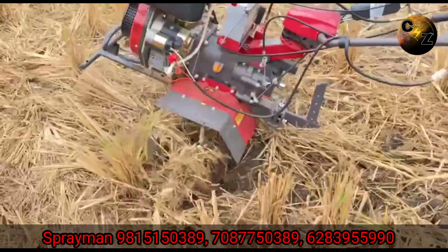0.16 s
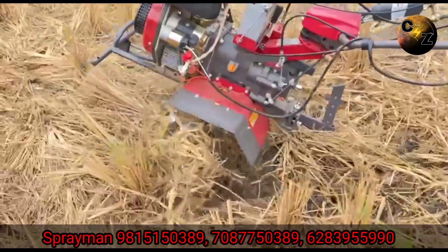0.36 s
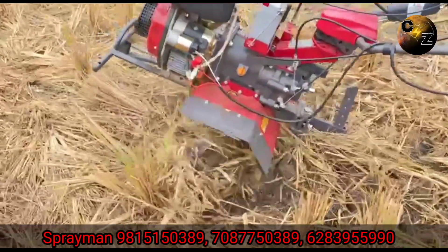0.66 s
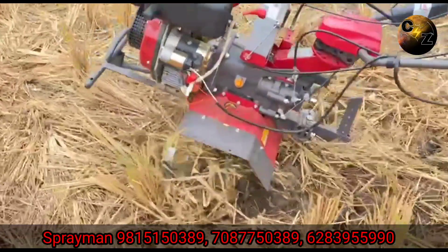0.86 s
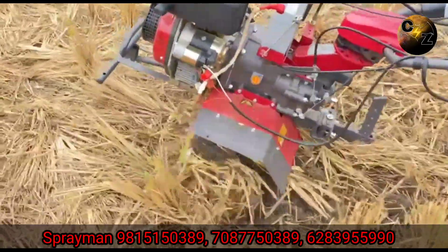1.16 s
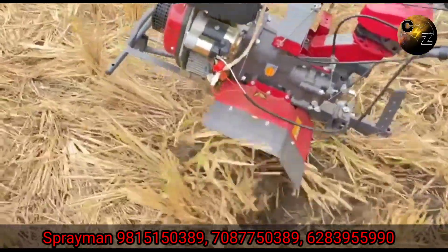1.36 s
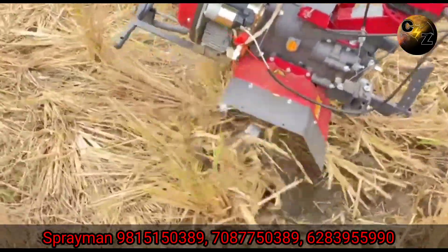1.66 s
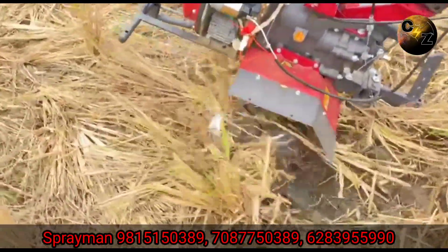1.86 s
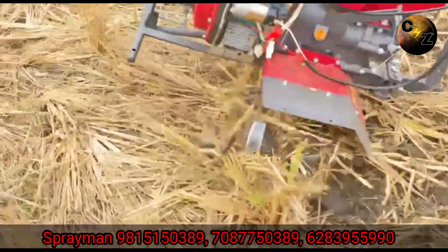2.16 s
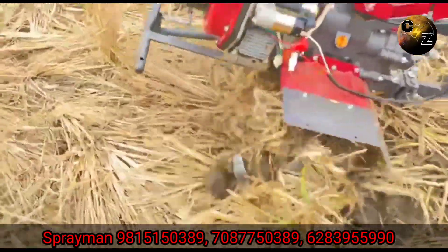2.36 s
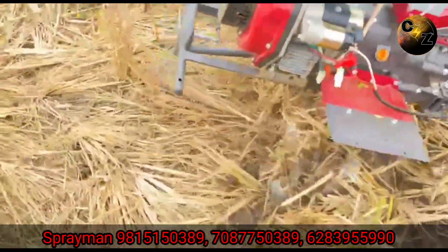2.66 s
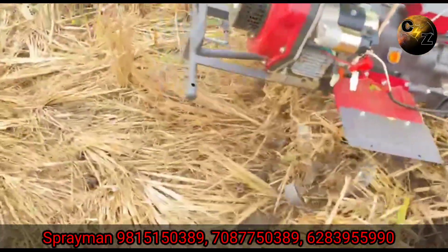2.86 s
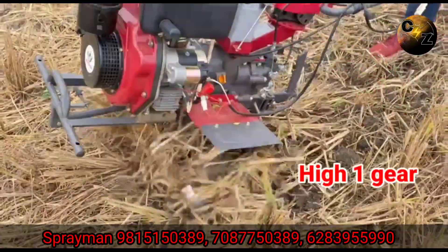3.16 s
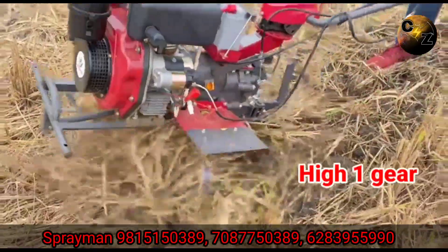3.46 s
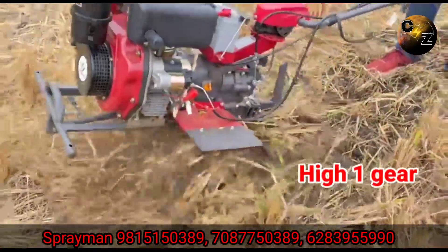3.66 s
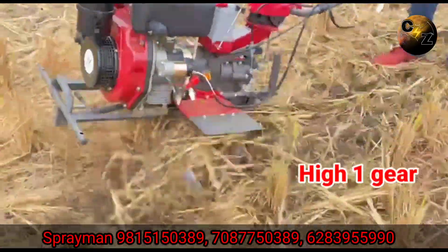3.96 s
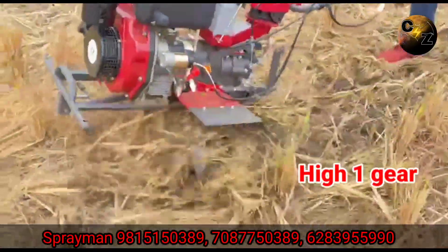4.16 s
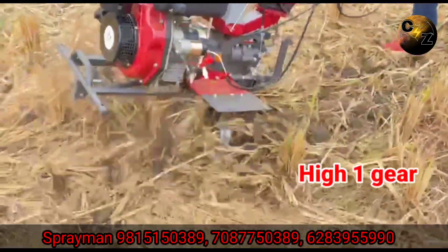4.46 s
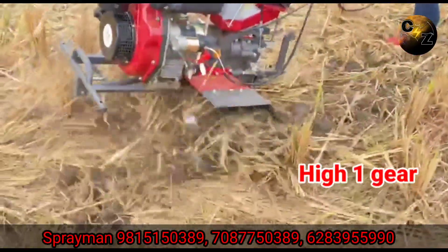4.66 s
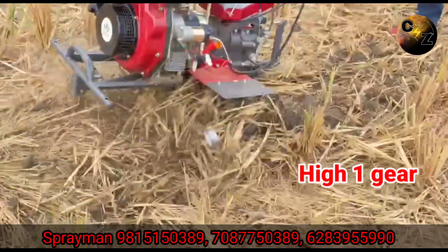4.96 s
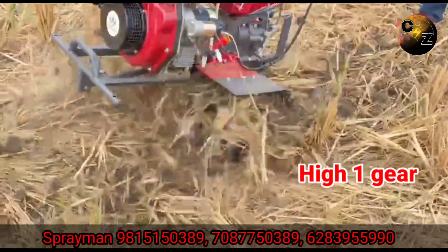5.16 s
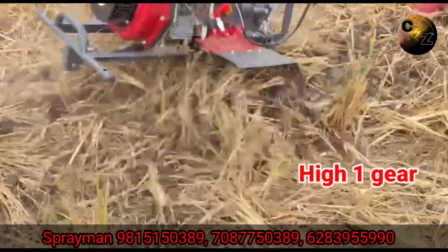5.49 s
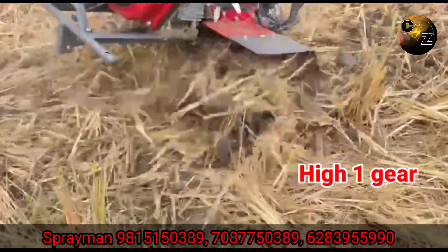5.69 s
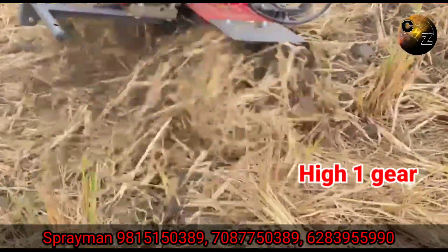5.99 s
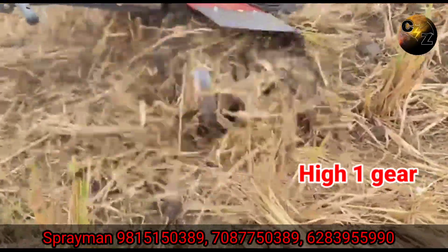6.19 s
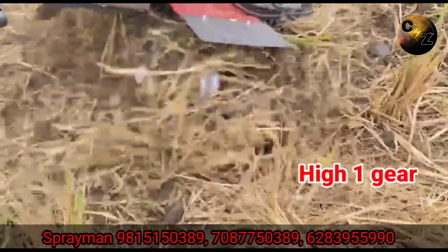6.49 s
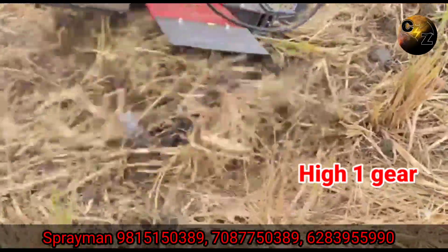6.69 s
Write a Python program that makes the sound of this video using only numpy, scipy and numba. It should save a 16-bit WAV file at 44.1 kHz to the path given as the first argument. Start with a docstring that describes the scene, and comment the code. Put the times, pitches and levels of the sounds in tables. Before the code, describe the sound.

From the start, a single-cylinder diesel tiller runs close to a stereo microphone in an open field. It has a fast, even beat of ringing metallic knocks and low exhaust thuds and pops. Engine parts and thrown straw rattle in time over a low wash of fan noise and churning soil. Over the first three seconds it grows slightly louder and shifts in tone as the machine turns, with a few harder rattles around 2.5 seconds. At about 3.3 seconds the sound quickly fades to a farther spot, where the same engine is much quieter and a touch slower. A faint gearbox whine swells gently around 4.2 seconds, most clearly at 5 seconds, and again near 5.7 seconds. The chugging and rattling continue, rising a little in level until the end, near 7 seconds.

```python
"""Diesel tiller in a stubble field

A one-cylinder four-stroke in the open, on a stereo recorder at two spots: close, then, after a short
cross-fade, farther off and much quieter. Each cycle combustion rings the block, the exhaust thuds and
pops a good half cycle later, and valve gear and thrown straw rattle in time over a wash of fan and soil.
The tone shifts as the machine turns; at the far spot a faint gearbox whine swells now and then."""
import sys
import numpy as np
from scipy import signal
from scipy.fft import rfft, irfft, next_fast_len
from scipy.io import wavfile
from scipy.ndimage import uniform_filter1d
from numba import njit

SR = 44100
rng = np.random.default_rng(int(sys.argv[2]) if len(sys.argv) > 2 else 0)


def waveform_to_disk(signal):
    """Save audio, clipped to [-1, 1], as 16-bit WAV at the path in sys.argv[1]."""
    frames = np.transpose(np.atleast_2d(signal))
    scaled = np.clip(frames, -1, 1) * 32767
    samples = np.round(scaled).astype(np.int16)
    wavfile.write(sys.argv[1], SR, samples)


N = 301203

# the machine passing each spot: t/s, engine level/dB, knock level/dB, how far it has turned/0-1
PASS_NEAR = [(0.0, -39, -41.5, 0.26), (0.4, -39.5, -42.5, 0.27), (0.72, -38, -39.5, 0.37),
             (0.95, -38, -39.5, 0.58), (1.3, -37.5, -40, 0.48), (1.55, -37, -37.5, 0.6),
             (1.9, -37.5, -39.5, 0.58), (2.15, -36.5, -37, 0.65), (2.38, -37.5, -37, 0.93),
             (2.55, -36.5, -38, 0.94), (2.9, -37, -39.5, 1), (3.3, -37, -39, 1)]
PASS_FAR = [(3.3, -49.5, -52.5, 0.05), (3.8, -51, -56.5, 0.053), (4.2, -51, -56, 0.28),
            (4.55, -51.5, -58, 0.57), (4.95, -50.5, -60.5, 0.81), (5.35, -49.5, -61.5, 1),
            (5.58, -48.5, -57.5, 0.92), (5.78, -48.5, -57, 1), (6.1, -47.5, -58.5, 0.89),
            (6.45, -47, -59.5, 0.91), (6.83, -48.5, -61, 0.86)]
# engine speed as the load changes, held until the next row: t/s, firing rate/Hz
SPEED_NEAR = [(-0.1771, 30.815), (1.3806, 30.657), (2.4244, 30.909)]
SPEED_FAR = [(3.218, 30.115), (3.7493, 29.773), (4.2867, 30.211), (4.8163, 29.784), (5.0849, 30.315),
             (5.3488, 30.111)]
# rows exhaust, cover, rattle, against the engine level: level before the turn/dB, level after/dB
BALANCE_NEAR = [(-2.65, -0.45), (-37, -12.5), (-5.5, -6.5)]
BALANCE_FAR = [(-1.1, -2.2), (-17, -18.5), (-4, -7)]
# rows knock ring f/Hz, right microphone lag/ms, knock left minus right/dB: before the turn, after
AIM_NEAR = [(1345, 1364), (0.112, 0.0076), (4.24, 3.6)]
AIM_FAR = [(1350, 1304), (0.114, 0.099), (2.5, 10.7)]
# block modes beside the main ring: f/Hz, width/Hz, level before the turn/dB, level after/dB
BLOCK_NEAR = [(1196, 185, -2, -6), (1406, 55, 3.5, 9), (1469, 187, -11, 1.5), (1787, 91, -3, -4),
              (2214, 47, 4, -1.5), (2380, 96, -0.5, -9.5), (3683, 110, -5, -6.5), (3968, 183, -2, -8),
              (5620, 270, -40, -16)]
BLOCK_FAR = [(1267, 77, -3, -11.5), (1598, 190, 0, -1.5), (1950, 70, 3.5, -2), (2380, 290, -4.5, 0.5),
             (3510, 780, -6, -4.5), (5450, 79, 5, -36)]
# strokes that shake the loose parts hardest: t/s, level against the usual flare/dB
HARD_STROKES = [(0.31, 6), (1.512, 5), (2.327, 4.5), (2.393, 6), (2.683, 5.5), (3.195, 3), (3.416, 3),
                (3.681, 2), (3.952, 5.5), (4.85, 1.5), (5.748, 6), (6.045, 2), (6.178, 2), (6.345, -1),
                (6.512, 3), (6.645, 4), (6.745, 4.5)]
# rattle colour with narrow gaps cut in the treble, in step and opposed: f/Hz, relative level/dB
COLOUR_STEP_NEAR = [(880, -63), (1500, -18), (1660, -7.5), (1820, -4), (2040, -7.5), (2250, -6), (3000, -7),
                    (3910, -4.5), (5530, -16), (7630, -12), (8470, -30), (8770, -121), (9410, -58),
                    (10000, -20), (11100, -14.5), (12000, -27.5), (15600, -53), (22000, -120)]
COLOUR_OPPOSED_NEAR = [(880, -67), (1500, 16), (1770, 4), (2440, 11.5), (4190, -5), (5730, 8.5),
                       (6300, -16), (7000, -53), (7830, 8), (9490, -42), (10400, 8), (11200, -103),
                       (12000, -82), (15600, -112), (22000, -120)]
COLOUR_STEP_FAR = [(500, -29), (880, -3), (1150, 9), (1500, 8), (1850, 2.5), (2110, 6.5), (2400, 8.5),
                   (3430, 5), (3770, 8.5), (5030, -2.5), (5580, 3.5), (7970, 0.5), (8770, -35), (10500, 0),
                   (12000, -9.5), (15600, -51), (22000, -120)]
COLOUR_OPPOSED_FAR = [(880, -55), (1500, -1), (2620, -9), (3520, -6), (3940, -8), (5160, -2), (5580, -4.5),
                      (6250, -7), (7000, -29), (7900, -14), (9740, -9), (10400, -37), (12000, -56),
                      (15600, -74), (22000, -120)]
# spectrum of fan wash and churned soil: f/Hz, relative level/dB
CHURN_SPECTRUM = [(20, -45), (36, -16), (48, 5), (150, -2), (185, -3.5), (400, 0), (680, -1), (860, 1.5),
                  (1020, -6), (1350, 1), (1650, -3.5), (2500, -75)]
# exhaust harmonics, one list before the turn and one after: multiple of the firing rate, level/dB
EXHAUST_NEAR = [(1, -23), (2, 1.5), (3, -5), (4, -12.5), (5, -15), (6, -41.5), (7, -14), (8, -9), (9, -21),
                (10, -9), (11, -9.5), (12, -17), (13, -11), (14, -18), (15, -24.5), (16, -20), (17, -33),
                (18, -16.5), (19, -21), (20, -13), (21, -12.5), (22, -10.5), (23, -17.5), (24, -18.5),
                (25, -39), (26, -8), (27, -10), (28, -13), (29, -6.5)], [(1, -22), (2, 1.5), (3, -4),
                (4, -11), (5, -15.5), (6, -17), (7, -6), (8, -9), (9, -18), (10, -14.5), (11, -14),
                (12, -13.5), (13, -24), (14, -18.5), (15, -11.5), (16, -11), (17, -23), (18, -13),
                (19, -14.5), (20, -15.5), (21, -13.5), (22, -23.5), (23, -19), (24, -26), (25, -44),
                (26, -37.5), (27, -46), (28, -32), (29, -38)]
EXHAUST_FAR = [(1, -21), (2, -0.5), (3, -10.5), (4, -11.5), (5, -13.5), (6, -22.5), (7, -8), (8, -10.5),
               (9, -21), (10, -14), (11, -8), (12, -13.5), (13, -34), (14, -32), (15, -29.5), (16, -32),
               (17, -30), (18, -19), (19, -29), (20, -21.5), (21, -14), (22, -32), (23, -16), (24, -29),
               (25, -18), (26, -19), (27, -25), (28, -26), (29, -27)], [(1, -21), (2, -0.5), (3, -9),
               (4, -8.5), (5, -12.5), (6, -21.5), (7, -16.5), (8, -16), (9, -28.5), (10, -14.5), (11, -12),
               (12, -13), (13, -23), (14, -13.5), (15, -9), (16, -16), (17, -28.5), (18, -19), (19, -31.5),
               (20, -24), (21, -21), (22, -36), (23, -26), (24, -31), (25, -31), (26, -43), (27, -44),
               (28, -53), (29, -35)]
# push or pull of each exhaust harmonic (6 to 12 take pipe_sign instead): sign
EXHAUST_SIGNS = [1, 1, -1, 1, 1] + [-1] * 24
# gearbox swells at the far spot: middle t/s, half length/s, peak level against the knock/dB
GEAR_SWELLS = [(4.25, 1, -12), (5.014, 0.2, 2), (5.665, 0.16, -7)]

CROSSFADE_S = (3.244, 3.38)
STROKE_SCATTER_DB, KNOCK_FOLLOWS = 2.26, 0.29  # the knock takes this share of a stroke's dB
BURN_S, BURN_SHARE, REPEAT_SHARE = 0.005, 0.19, 0.65
GLIDE_FADE, FLARE_FADE, VALVE_FADE = 0.052, 0.55, 0.1  # shares of a cycle, like every "place" below
COVER_WIDTH_HZ, BRIGHT_HZ = 76, 6500
GEAR_HZ, GEAR_REST_DB = 1107, -15
SHADE_HZ, SHADE_WIDTH_HZ, MONO_HZ, TOP_HZ = 3000, 2200, 197, 11900
ANTIPHASE = np.array([[1], [-1]])


def undb(db):
    """Decibels to gain."""
    return 10 ** (np.asarray(db) / 20)


def unit(x):
    """Scale to rms 1."""
    return x / np.sqrt(np.mean(x ** 2))


@njit
def bandpass(x, hz, width):
    """State-variable band-pass with a moving centre, gain 1 at the centre."""
    y, band, low = np.empty(len(x)), 0., 0.
    for i in range(len(x)):
        g, damping = np.tan(np.pi * hz[i] / SR), width / hz[i]
        v = (band + g * (x[i] - low)) / (1 + g * (g + damping))
        band, low, y[i] = 2 * v - band, low + 2 * g * v, damping * v
    return y


def resonate(x, hz, width):
    """A resonance that swells in over a few periods before it dies."""
    centre = hz * np.ones(N)
    return bandpass(bandpass(x, centre, width), centre, width)


def wander(rate):
    """Random levels held 1 / rate s and smoothed twice."""
    hold = int(SR / rate)
    steps = np.repeat(rng.standard_normal(N // hold + 1), hold)
    return uniform_filter1d(uniform_filter1d(steps, hold), hold)[:N]


def colour(x, spectrum):
    """Shape a sound by points of f/Hz, level/dB."""
    hz, db = np.transpose(spectrum)
    size = next_fast_len(N)
    bins = np.arange(1, size // 2 + 2) * SR / size
    return irfft(rfft(x, size) * undb(np.interp(np.log(bins), np.log(hz), db)), size)[:N]


def mic_pair(x, lag_ms, pan_db=0):
    """Sound reaches the left microphone first, and louder by pan_db."""
    late = np.interp(np.arange(N) - lag_ms * SR / 1000, np.arange(N), x)
    return np.array([x * undb(pan_db / 2), late * undb(-pan_db / 2)])


def turned(before, after, turn):
    """A setting part of the way through the machine's turn."""
    return before + (after - before) * turn


def firing_times(speed):
    """Time of every firing from the engine speed."""
    starts, rate = np.transpose(speed)
    edges = np.append(starts, starts[-1] + N / SR)
    fired = np.append(0, np.cumsum(rate * np.diff(edges)))
    return np.interp(np.arange(int(fired[-1])), fired, edges)


def stroke_levels(firing):
    """How hard each stroke shakes the loose parts, in dB."""
    db = STROKE_SCATTER_DB * rng.standard_normal(len(firing))
    for at_s, hard_db in HARD_STROKES:
        if firing[0] < at_s < firing[-1]:
            db[np.argmin(abs(firing - at_s))] = hard_db
    return db


def blows(firing, place, jitter_s, scatter_db):
    """One click at the same place in each cycle, uneven in time and size."""
    cycles = np.arange(len(firing))
    chance = rng.standard_normal((len(cycles), 2))
    at = SR * (np.interp(cycles + place, cycles, firing) + jitter_s * chance[:, 0])
    inside = (at > 0) & (at < N - 2)
    sample, fraction = at[inside].astype(int), at[inside] % 1
    size = undb(scatter_db * chance[inside, 1])
    clicks = np.full(N, 1e-18)
    clicks[sample] += size * (1 - fraction)
    clicks[sample + 1] += size * fraction
    return clicks


def knock(firing, place, hard_db, turn, ring_hz, cover_db,
          modes, ring_width_hz, ring_gain, cover_hz, slap_db):
    """Combustion and a piston slap ring block and cover; a ragged burn shakes the upper modes."""
    hit = blows(firing, place, jitter_s=.00004, scatter_db=.6) * undb(hard_db)
    hit += undb(slap_db) * blows(firing, place + .255, jitter_s=.0002, scatter_db=2.)
    burn_envelope = signal.lfilter([1], [1, -np.exp(-1 / (BURN_S * SR))], hit)
    fresh = unit(burn_envelope * rng.standard_normal(N))
    # part of the shaking is the same on every stroke
    pattern = rng.choice([-1., 1.], size=2048) * np.exp(-np.arange(2048) / (BURN_S * SR))
    repeated = unit(signal.fftconvolve(hit, pattern)[:N])
    burn = unit(REPEAT_SHARE * repeated + (1 - REPEAT_SHARE) * fresh)
    push = unit(hit) + BURN_SHARE * burn
    ring = resonate(push, ring_hz, ring_width_hz)
    block = ring_gain * bandpass(ring, ring_hz, ring_width_hz)  # a third pass rounds the attack
    for hz, width, before_db, after_db in modes:
        ragged = np.clip((hz - 1500) / 2200, 0, 1)
        drive = (1 - ragged) * push + ragged * burn
        block += undb(turned(before_db, after_db, turn)) * resonate(drive, hz, float(width))
    return unit(block) + undb(cover_db) * unit(resonate(push, cover_hz, COVER_WIDTH_HZ))


def flare(cycles, fade, rise):
    """A quick rise and slower fade once a cycle."""
    phase = cycles % 1
    return np.exp(-phase / fade) * (1 - np.exp(-phase / rise))


def rattle(cycles, stroke_db, turn, colours, opposed_db, burst_db, valve_db, valve_place, bright):
    """Dense metal and straw grains that flare at each firing and again as a valve moves."""
    stroke = np.clip(cycles, 0, len(stroke_db) - 1).astype(int)
    envelope = 1 + undb(burst_db + stroke_db[stroke]) * flare(cycles, FLARE_FADE, rise=0.041)
    envelope += undb(valve_db) * flare(cycles - valve_place, VALVE_FADE, rise=0.027)
    envelope *= undb(.8 * wander(40))
    grains = envelope * undb(1.5 * rng.exponential(size=N))
    in_step, opposed = (unit(colour(grains * rng.standard_normal(N), shape)) for shape in colours)
    pair = in_step + undb(opposed_db) * opposed * ANTIPHASE
    # the rattle's treble around 6.5 kHz brightens as the turn goes on
    treble = np.array([bandpass(side, np.full(N, BRIGHT_HZ), 1500.) for side in pair])
    return pair + bright * turn * treble


def churn(cycles, lag_ms, opposed_db=-1.1, opposed_above_hz=670):
    """Low wash of the fan and of soil in the tines, wide above the bass, throbbing with the firing."""
    in_step, opposed = (unit(colour(rng.standard_normal(N), CHURN_SPECTRUM)) for _ in range(2))
    opposed = signal.sosfilt(signal.butter(2, opposed_above_hz, "high", fs=SR, output="sos"), opposed)
    throb = 1 + .5 * np.exp(-(cycles % 1) / 1.4)
    return (mic_pair(in_step, lag_ms) + undb(opposed_db) * opposed * ANTIPHASE) * throb


def exhaust(cycles, turn, harmonics, pipe_sign, boom_place, thud_place, pipe_place, pop_place):
    """The blow-down pulse as harmonics: silencer boom and thud, the pipe's note, the pop from its end."""
    pulse = np.zeros(N)
    slip = .0004 * wander(20)  # the crank runs a little unevenly
    for (order, before_db), (_, after_db), sign in zip(*harmonics, EXHAUST_SIGNS):
        place = (boom_place if order <= 5 else thud_place if order <= 9
                 else pipe_place if order <= 12 else pop_place)
        sign = pipe_sign if 6 <= order <= 12 else sign
        # higher harmonics differ more from cycle to cycle
        drift = min(.002 * order, .03) * wander(5)
        waver_db = min(.15 * order, 1.2) * wander(9)
        gain = undb(turned(before_db, after_db, turn) + waver_db)
        phase = order * (cycles - place + slip) + drift
        pulse += sign * gain * np.sqrt(2) * np.cos(2 * np.pi * phase)
    return pulse


def gear_whine(t, swells):
    """The gearbox sings one faint steady note, with any smooth swells on top."""
    level = undb(GEAR_REST_DB)
    for middle_s, half_s, db in swells:
        offset = np.clip((t - middle_s) / half_s, -1, 1)
        level = level + undb(db) * np.cos(np.pi / 2 * offset) ** 2
    return level * np.sin(2 * np.pi * GEAR_HZ * t)


def tiller(speed, course, balance, aim, knock_place, glide, churn_db, shade, swells,
           knock_tone, rattle_tone, exhaust_tone):
    """The whole machine at the microphones from one spot, its beats locked to one crank."""
    t = np.arange(N) / SR
    firing = firing_times(speed)
    count = np.arange(len(firing))
    cycles = np.interp(t, firing, count)
    times, *columns = np.transpose(course)
    engine_db, knock_db, turn = (np.interp(t, times, column) for column in columns)
    exhaust_db, cover_db, rattle_db = (engine_db + turned(*row, turn) for row in balance)
    ring_hz, lag_ms, pan_db = (turned(*row, turn) for row in aim)
    stroke_db = stroke_levels(firing)
    knock_cycles = cycles - knock_place
    hard_db = KNOCK_FOLLOWS * np.interp(knock_cycles, count, stroke_db)
    ring_hz *= 1 + glide * np.exp(-(knock_cycles % 1) / GLIDE_FADE)  # the ring drops as the piston falls
    block = knock(firing, knock_place, hard_db, turn, ring_hz, cover_db - knock_db, **knock_tone)
    wash = churn(cycles, lag_ms)
    grit = rattle(knock_cycles + .03, stroke_db, turn, **rattle_tone)  # starts just ahead of the knock
    pulse = exhaust(cycles, turn, **exhaust_tone)
    left, right = (mic_pair(undb(knock_db) * (block + gear_whine(t, swells)), lag_ms, pan_db)
                   + undb(rattle_db) * (grit + undb(churn_db) * wash)
                   + mic_pair(undb(exhaust_db) * pulse, lag_ms))
    # the right microphone lies in the shadow of the recorder's body
    return np.array([left, right - shade * bandpass(right, np.full(N, SHADE_HZ), SHADE_WIDTH_HZ)])


def scene():
    """The close spot cross-fades into the far one."""
    near = tiller(
        SPEED_NEAR, PASS_NEAR, BALANCE_NEAR, AIM_NEAR,
        knock_place=-.035, glide=0, churn_db=-3.5, shade=0.41, swells=[],
        # negative gain: the main ring swings against its neighbours
        knock_tone=dict(modes=BLOCK_NEAR, ring_width_hz=370., ring_gain=-1.5,
                        cover_hz=970, slap_db=-14.5),
        rattle_tone=dict(colours=(COLOUR_STEP_NEAR, COLOUR_OPPOSED_NEAR), opposed_db=-1.5,
                         burst_db=2, valve_db=3, valve_place=.43, bright=0.54),
        exhaust_tone=dict(harmonics=EXHAUST_NEAR, pipe_sign=-1,
                          boom_place=.575, thud_place=.57, pipe_place=.6, pop_place=.6))
    far = tiller(
        SPEED_FAR, PASS_FAR, BALANCE_FAR, AIM_FAR,
        knock_place=-.06, glide=0.11, churn_db=-7, shade=0.064, swells=GEAR_SWELLS,
        knock_tone=dict(modes=BLOCK_FAR, ring_width_hz=260., ring_gain=1.8,
                        cover_hz=952, slap_db=-10.5),
        rattle_tone=dict(colours=(COLOUR_STEP_FAR, COLOUR_OPPOSED_FAR), opposed_db=-1,
                         burst_db=6.5, valve_db=6, valve_place=.25, bright=0.05),
        exhaust_tone=dict(harmonics=EXHAUST_FAR, pipe_sign=1,
                          boom_place=.525, thud_place=.326, pipe_place=.326, pop_place=.584))
    far_share = np.interp(np.arange(N) / SR, CROSSFADE_S, (0, 1))
    return near * (1 - far_share) + far * far_share


def record(dry):
    """The recorder keeps the bass in the middle and cuts the top."""
    mid, side = (dry[0] + dry[1]) / 2, (dry[0] - dry[1]) / 2
    side = signal.sosfilt(signal.butter(2, MONO_HZ, "high", fs=SR, output="sos"), side)
    top_cut = signal.ellip(10, .2, 80, TOP_HZ, fs=SR, output="sos")
    return signal.sosfilt(top_cut, [mid + side, mid - side])


dry = scene()
out = record(dry)
waveform_to_disk(out)
```